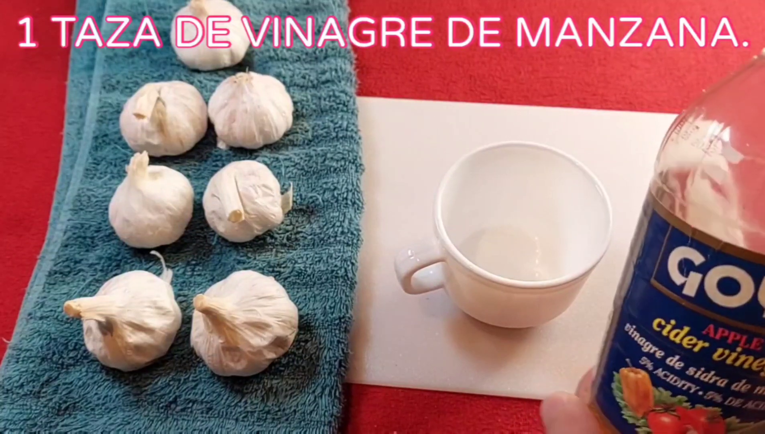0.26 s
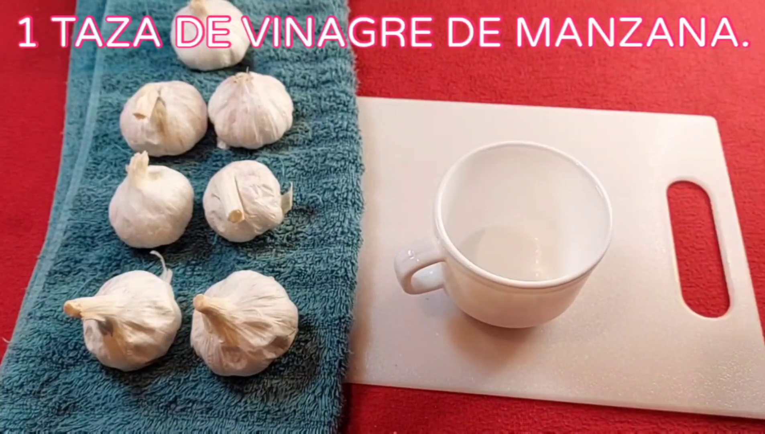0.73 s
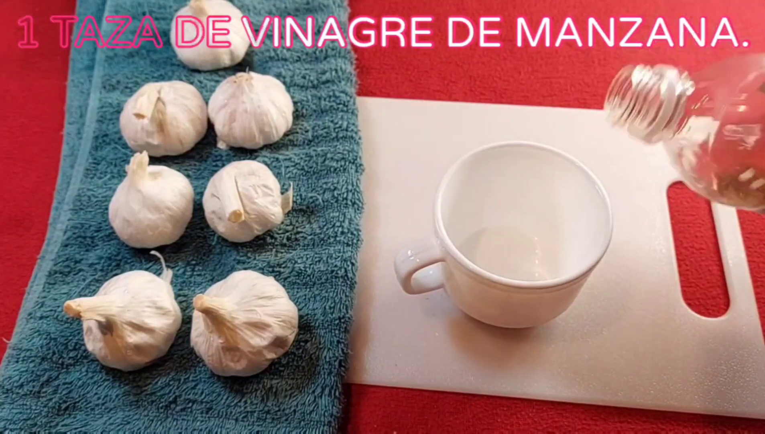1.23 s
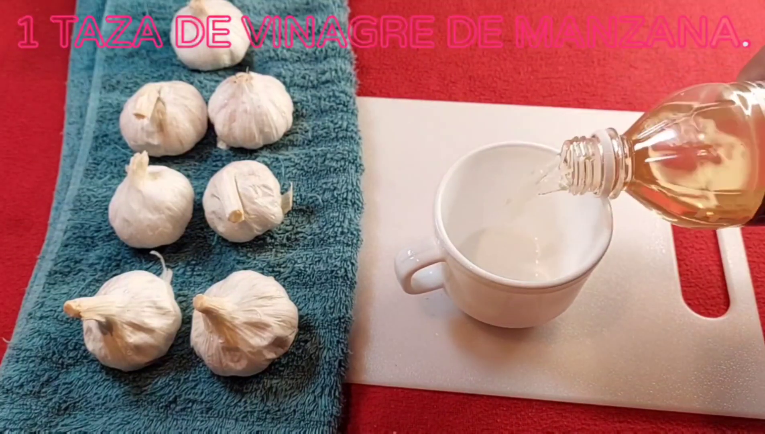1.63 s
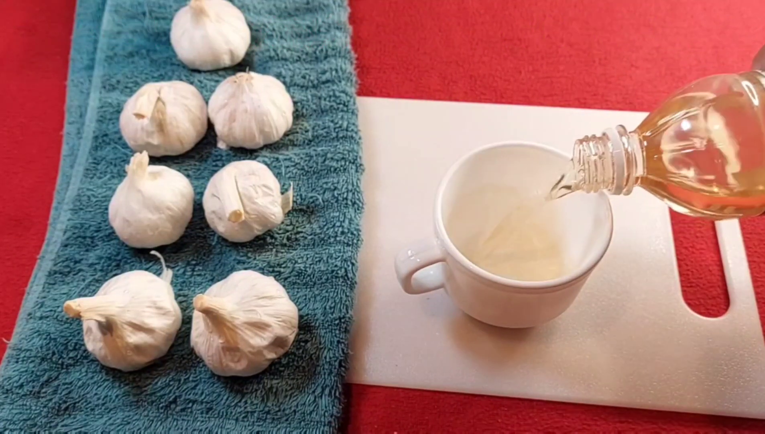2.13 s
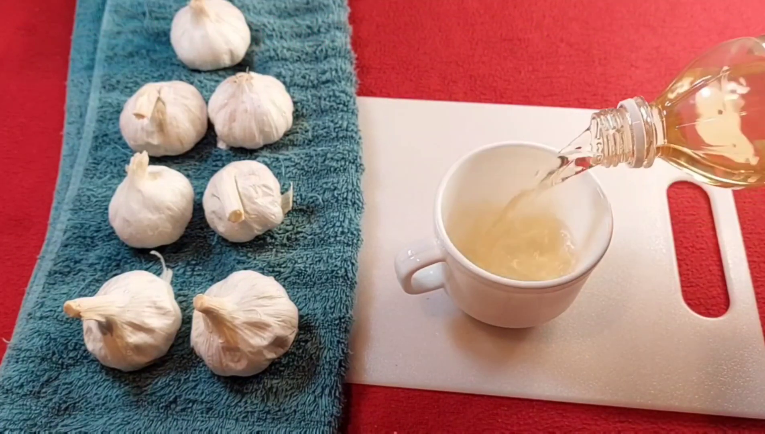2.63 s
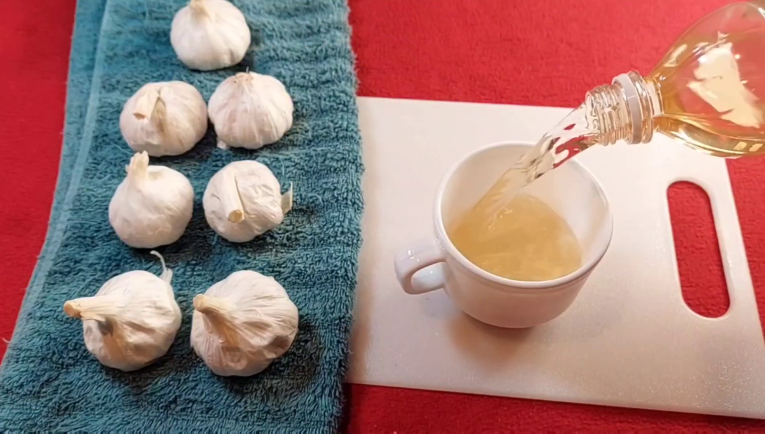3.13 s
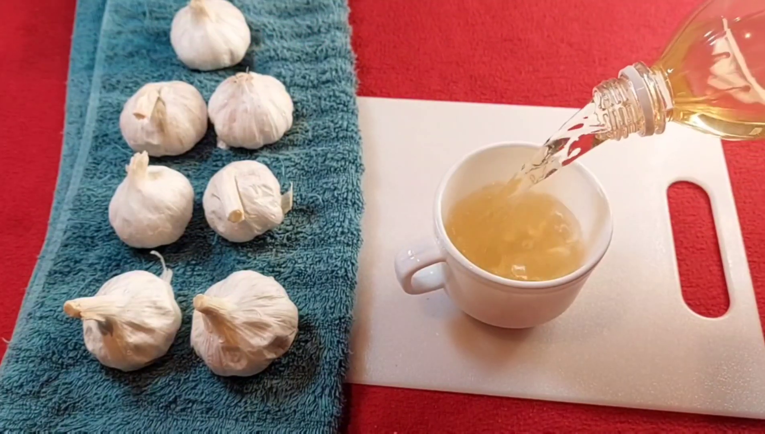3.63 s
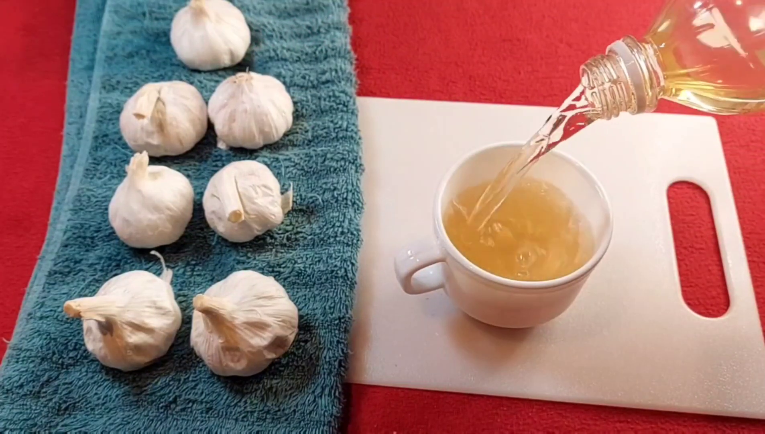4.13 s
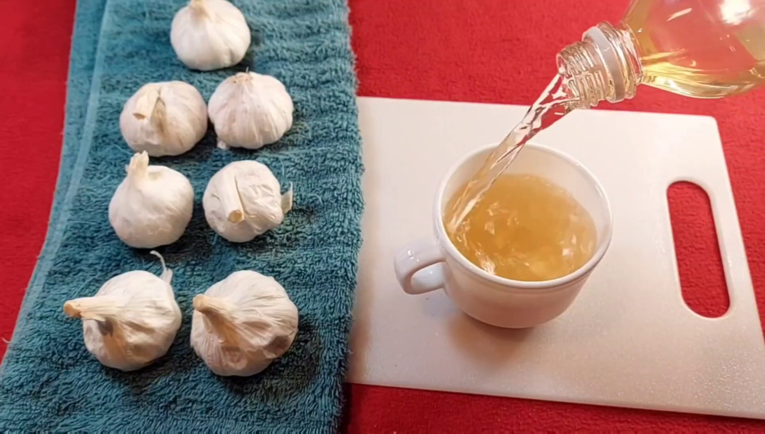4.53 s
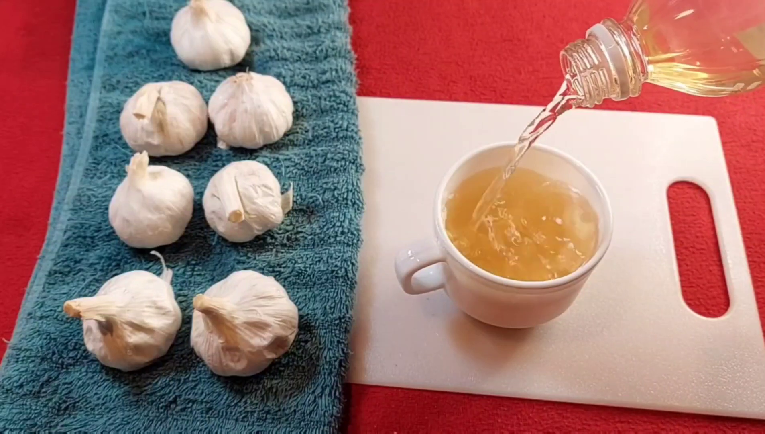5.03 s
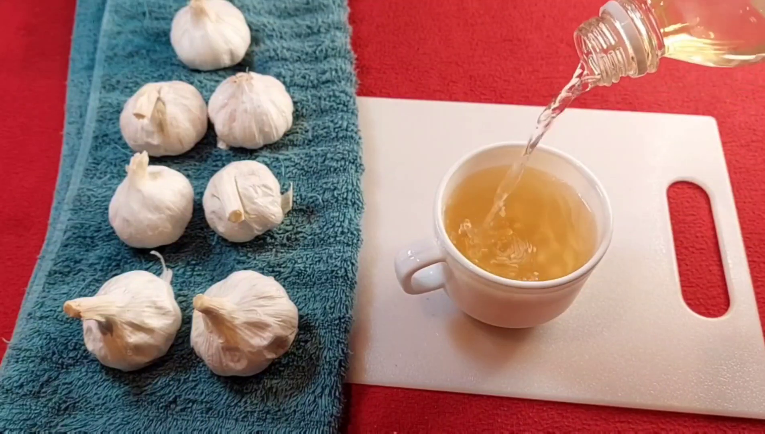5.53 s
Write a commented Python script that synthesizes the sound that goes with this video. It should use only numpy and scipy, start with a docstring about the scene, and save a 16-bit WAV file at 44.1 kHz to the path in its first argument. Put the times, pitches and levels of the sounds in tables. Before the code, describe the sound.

Close stereo microphone, small live kitchen, appliance hum throughout. First a rasping cap and hard plastic clicks, then a brief fainter rub with a snap. A pause. Liquid starts down the cup wall: delicate glassy bubbles, low puffs bumping mostly the right side, near silence, a few more plips, then a bubbling, hollow plunge of liquid that runs to the end.

```python
"""A plastic bottle opens with a short rasp and is lifted: slipping friction and snaps ring its wall modes.
Then a thin stream of vinegar slides down the wall of a china cup with faint, single chirping bubbles.
Puffs of air bump the microphone early in the pour, as low, short swings.
The stream plunges into the pool and burbles: surges drive bubbles, spray and wash, and a hollow sounds.
Throughout, a motor hums in the small kitchen: wavering tones over a rush of noise."""
import sys
import numpy as np
from scipy import signal
from scipy.fft import rfft, irfft, next_fast_len
from scipy.io import wavfile

SR = 44100
rng = np.random.default_rng(int(sys.argv[2]) if len(sys.argv) > 2 else 0)


def dump(signal):
    """Clip the signal to [-1, 1] and save it as 16-bit WAV at the path in sys.argv[1]."""
    limited = np.clip(np.atleast_2d(signal).T, -1, 1)
    pcm = np.round(limited * 32767).astype(np.int16)
    wavfile.write(sys.argv[1], SR, pcm)


N = 254456
TIME = np.arange(N) / SR

# bubbles that stand out as single plips, levels ahead of the cup and the pan:
# [t/s, pitch f/Hz, peak level/dB, life to -60 dB/cycles]
BUBBLES = [ (2.017, 2560, -57, 56), (2.018, 12100, -47, 8), (2.045, 12200, -47, 20), (2.072, 8300, -50, 35),
           (2.084, 10350, -43, 34), (2.115, 10400, -44.5, 13), (2.122, 6060, -60, 22),
           (2.141, 7390, -47.5, 34), (2.180, 7540, -49, 10), (2.199, 5630, -44, 12), (2.2, 3270, -53, 40),
           (2.225, 3200, -55, 27), (2.272, 7600, -39, 12.4), (2.278, 4180, -44, 27),
           (2.286, 13400, -42.5, 11), (2.388, 7800, -45, 35), (2.429, 9100, -46.5, 22),
           (2.453, 10000, -47, 11), (2.454, 4840, -58, 22), (2.463, 1350, -62, 18), (2.465, 3680, -52, 32),
           (2.49, 3500, -54, 13), (2.499, 2000, -64, 23), (2.5025, 6370, -38, 16), (2.503, 3670, -44, 22),
           (2.512, 4200, -49, 14), (2.524, 1950, -62, 14), (2.601, 10500, -46, 19), (2.669, 1600, -63, 22),
           (2.685, 1500, -60, 25), (2.706, 2500, -56, 16), (2.715, 1750, -61, 24), (2.732, 1830, -64, 24),
           (2.708, 7900, -53, 40), (2.721, 6470, -53, 21), (2.738, 4350, -54, 68), (2.744, 12800, -43, 11),
           (2.828, 1195, -60.5, 56), (2.857, 6100, -42, 20), (3.066, 8600, -55, 12),
           (3.125, 10000, -54, 13), (3.171, 10100, -52.5, 7.8), (3.244, 7800, -51, 36),
           (3.250, 1870, -54.5, 39), (3.268, 1900, -56, 30), (3.257, 3000, -55.5, 35),
           (3.27, 3100, -57, 44), (3.308, 3030, -64, 24), (3.357, 7800, -59, 110), (3.724, 5000, -67, 44),
           (3.768, 1880, -68, 33), (3.850, 6430, -66, 31), (3.996, 2215, -56.5, 62), (4.008, 2250, -56, 68),
           (4.044, 8200, -60, 3.3), (4.463, 5520, -52, 29), (4.487, 4820, -50, 12),
           (4.512, 4860, -50.5, 73), (4.528, 1650, -51.5, 13), (4.543, 3610, -42.5, 36),
           (4.556, 3380, -49, 28), (4.569, 3720, -53.5, 23), (4.590, 3550, -60, 28), (4.549, 1343, -52, 19),
           (4.572, 1370, -60, 14), (4.622, 3460, -59, 23), (4.639, 3600, -59, 24), (4.681, 6200, -62, 25),
           (4.822, 2660, -51, 19), (4.836, 2420, -61, 10), (4.907, 4630, -44, 15), (4.918, 4770, -47.5, 19),
           (4.949, 4960, -60, 26), (4.976, 4880, -61, 19), (5.003, 4830, -48.5, 16.5),
           (5.014, 4700, -49.5, 14), (5.028, 1890, -53, 8.9), (5.038, 1680, -58, 24),
           (5.053, 1780, -48, 15), (5.069, 1450, -51, 19), (5.076, 1616, -48, 71), (5.1017, 1550, -43, 14),
           (5.102, 1060, -46.5, 17), (5.115, 1570, -37.5, 19), (5.115, 2480, -46.5, 18),
           (5.123, 1410, -53, 22), (5.129, 2170, -43, 23), (5.142, 2150, -47, 18),
           (5.134, 7250, -34.5, 8.9), (5.149, 4300, -42, 14), (5.171, 1860, -33, 13),
           (5.187, 1900, -31, 20), (5.189, 2530, -45.5, 16), (5.197, 1920, -34, 19), (5.198, 2530, -46, 20),
           (5.21, 1815, -45, 17), (5.2247, 1518, -45, 12), (5.21, 5130, -43, 17), (5.228, 5400, -42.5, 25),
           (5.226, 11300, -37, 45), (5.2357, 2230, -33, 26), (5.251, 1900, -59, 13),
           (5.261, 5440, -42.5, 9.8), (5.263, 3940, -40, 14), (5.284, 6530, -36.5, 8.4),
           (5.294, 2200, -43, 21), (5.295, 2900, -46, 24), (5.313, 11600, -43, 22.5),
           (5.333, 7640, -45.5, 25), (5.340, 1540, -45.5, 26), (5.359, 1910, -44, 25),
           (5.359, 7600, -47, 19), (5.411, 2210, -48.5, 31), (5.483, 2100, -54.5, 19),
           (5.501, 1887, -46, 9.4), (5.542, 2130, -53.5, 43), (5.556, 5270, -52.5, 12),
           (5.58, 1450, -48.5, 10), (5.583, 910, -55, 11), (5.595, 1645, -60, 12.7),
           (5.597, 10800, -36, 14), (5.599, 3160, -49, 13), (5.613, 1387, -52, 21),
           (5.614, 3420, -41.5, 37), (5.615, 5130, -39, 8.6), (5.620, 2000, -49, 19), (5.63, 1260, -45, 14),
           (5.630, 14300, -32.5, 12), (5.631, 2000, -51, 20), (5.648, 1820, -40, 16),
           (5.6504, 1170, -45, 12), (5.662, 1660, -48, 14), (5.667, 2180, -50, 18), (5.692, 3740, -48, 22),
           (5.693, 1500, -44, 12), (5.701, 1310, -48, 18), (5.696, 7540, -37, 49), (5.695, 11500, -23, 19),
           (5.7279, 2160, -31, 27), (5.728, 7200, -35, 15), (5.730, 1425, -40.5, 43),
           (5.7338, 2550, -33.5, 27), (5.7405, 1660, -52, 16), (5.742, 11200, -35, 29),
           (5.745, 2380, -46, 15), (5.7558, 5200, -32, 31), (5.756, 13000, -34, 22)]
# surges, when the stream breaks the surface and drags air under, levels ahead of each layer's trim:
# [t/s, hold/s, churn level/dB, typical bubble pitch f/Hz, fine spray level/dB]
SURGES = [(2.026, 0.14, -79, 5900, -70.5), (2.471, 0.068, -66.5, 3070, -76.5),
          (2.72, 0.056, -67, 1850, -73.5), (3.248, 0.05, -67, 2240, -72),
          (4.549, 0.084, -65.5, 3270, -75.5), (4.906, 0.18, -66, 4720, -79.5),
          (5.101, 0.18, -56, 2130, -72), (5.327, 0.034, -59.5, 1930, -65.5), (5.484, 0.078, -66, 2079, -71),
          (5.602, 0.049, -56.5, 1760, -71), (5.733, .04, -57.5, 1680, -59)]
# ringing modes of the bottle wall, levels relative to what excites them: [f/Hz, level/dB, t60/s]
BOTTLE = [(754, -8, 0.016), (880, -12, 0.014), (1164, -5.5, 0.011), (1440, -3, 0.0056),
          (1906, -13.5, 0.025), (2690, -15.5, 0.026), (3076, -14, 0.022), (3784, -14.5, 0.028),
          (4030, -24, 0.017), (5040, -13.5, 0.017)]

FULL_CHURN_DB = -55   # the churn at which bubble rate and pitch climb have their stated values
FIZZ_HZ = 5860        # typical pitch of the small fizz


def bubbles(wander_db=2, fizz_pan_db=-3.5, lag_s=.00008, faint_climb=0.24):
    """Plips and fainter bubbles, each at its own spot, higher ones to the right; churn makes them chirp faster."""
    full_climb_per_s, climb_follows = 52, 0.93   # share of the pitch per second; share of the churn's dB
    typical_db, typical_hz = churn()
    climb_per_s = full_climb_per_s * from_db(climb_follows * (typical_db - FULL_CHURN_DB))
    places = rng.standard_normal((N // 10, 2))
    faint = fragments() + swarm(typical_db, typical_hz)
    climbs = [1] * len(BUBBLES) + [faint_climb] * len(faint)
    out = np.zeros((2, N))
    for (s, hz, db, cycles), climb, (side, path) in zip(BUBBLES + faint, climbs, places):
        rise = climb * climb_per_s[min(int(s * SR), N - 1)] * cycles / hz
        pan_db = wander_db * min(hz / FIZZ_HZ, 1) * side + fizz_pan_db * hz / FIZZ_HZ
        left, right = pan(pan_db) * bubble(hz, db, cycles, rise)
        add(out[0], s, left)
        add(out[1], s + lag_s * path, right)
    return out


def bubble(hz, db, cycles, rise, birth=0.072):
    """A trapped bubble swells, rings and dies; its pitch climbs as it nears the surface."""
    samples = np.arange(int(1.2 * cycles / hz * SR) + 2)
    life = samples * hz / (cycles * SR)   # 1 when the decay reaches -60 dB
    turns = cycles * (life + rise * life ** 2 / 2)
    swell = from_db(-60 * life) * (1 - np.exp(-(life / birth) ** 2))
    return from_db(db) * swell / swell.max() * np.sin(2 * np.pi * turns)


def fragments(count=3, cycles=30):
    """A plip breaks up into a dying run of bubbles near its pitch; rows as in BUBBLES."""
    gap_s, loss_db, top_db, detune = 0.011, 5.5, -54, 0.066
    chance = rng.uniform(-1, 1, (len(BUBBLES), count, 2))
    rows = []
    for (s, hz, db, _), run in zip(BUBBLES, chance):
        for k, (late, pitch) in enumerate(run, 1):
            level_db = min(db, top_db) - loss_db * k
            rows.append((s + gap_s * (k + late / 2), hz * (1 + detune * pitch), level_db, cycles))
    return rows


def swarm(typical_db, typical_hz, cycles=18, octaves=1.63):
    """Faint bubbles at random, more of them as the churn grows; rows as in BUBBLES."""
    pour_start_s, fizz_share = 1.9, 0.23   # a fixed share is small fizz, whatever the surge
    full_per_s, rate_follows = 390, 0.42   # the bubble rate follows this share of the churn's dB
    per_s = full_per_s * from_db(rate_follows * (typical_db - FULL_CHURN_DB))
    born = np.flatnonzero((rng.random(N) < per_s / SR) & (TIME > pour_start_s))
    rows = []
    for i, (kind, pitch, life) in zip(born, rng.random((N, 3))[born]):
        centre_hz = FIZZ_HZ if kind < fizz_share else typical_hz[i]
        hz = centre_hz * 2 ** (octaves * (pitch - .5))
        rows.append((i / SR, hz, typical_db[i], cycles * (.5 + life)))
    return rows


def churn(trickle_db=-83, trickle_hz=2365):
    """The strongest surge, or else the trickle down the wall, sets the bubbles' typical dB and pitch."""
    _, _, db, hz, _ = np.transpose(SURGES)
    levels = np.vstack([surge_levels(db), np.full(N, trickle_db)])
    return levels.max(0), np.append(hz, trickle_hz)[levels.argmax(0)]


def surge_levels(levels_db, rise_db_per_s=234, fall_db_per_s=158.5):
    """Each surge rises quickly to its level, holds and ebbs; one row of dB per surge."""
    rows = []
    for (s, hold, *_), db in zip(SURGES, levels_db):
        corners_s = [s - 1, s, s + hold, s + hold + 1]
        rows.append(np.interp(TIME, corners_s, [db - rise_db_per_s, db, db, db - fall_db_per_s]))
    return np.array(rows)


def wash(wash_db=-10.0):
    """Countless bubbles too faint to tell apart merge into a wet wash under each surge."""
    # colour of the churning pool, before levelling: [f/Hz, density level/dB]
    wash_colour = [(400, -17), (800, -13), (1400, 8), (2300, -5.5), (3000, -4.5), (4500, -8), (9000, -20)]
    level_db = surge_levels([row[2] for row in SURGES]).max(0) + wash_db
    return friction(np.column_stack([TIME, level_db]), wash_colour, slips_per_s=2500, spread_db=2)


def spray(pinch_db=-18, pinch_t60=0.039, brief_cycles=16, prickle_db=-4):
    """Fine mist prickles on the surface; each plip pinches off with a tick, strongest for the briefest."""
    # colour of mist and ticks, before levelling: [f/Hz, density level/dB]
    spray_colour = [(500, -3), (850, -4.5), (1900, -8), (3200, -7.5), (6000, -6.5), (10000, -4),
                    (15000, -6.5)]
    t, ticks = TIME[:SR // 50], np.zeros(N)
    for s, hz, db, cycles in BUBBLES:
        briefness = (brief_cycles / cycles) ** 0.91
        add(ticks, s, from_db(db + pinch_db - 60 * t / pinch_t60) * briefness)
    spray_db = surge_levels([row[-1] for row in SURGES]).max(0) + prickle_db
    prickle = friction(np.column_stack([TIME, spray_db]), spray_colour, slips_per_s=1200, spread_db=3)
    return prickle + ticks * coloured(rng.standard_normal((2, N)), spray_colour)


def droplets(per_s=70, above_spray_db=15, spread_db=7, hz=10000, octaves=1.0, cycles=17):
    """Flung droplets land one by one, each trapping a tiny bubble that ticks."""
    typical_db = surge_levels([row[-1] for row in SURGES]).max(0) + above_spray_db
    born = np.flatnonzero(rng.random(N) < per_s / SR)
    out = np.zeros(N)
    for i, (pitch, loud) in zip(born, rng.random((N, 2))[born] - .5):
        level_db = typical_db[i] + spread_db * loud
        add(out, i / SR, bubble(hz * 2 ** (octaves * pitch), level_db, cycles, rise=0))
    return out


def hollow(width_hz=35):
    """Turbulence sounds the hollow dug in the pool by the stream; its note falls as it deepens."""
    # note of the hollow, levels ahead of the pan: [t/s, f/Hz, rms level/dB]
    hollow_curve = [(5.03, 1520, -73), (5.07, 1230, -71), (5.105, 1080, -59), (5.15, 970, -74),
                    (5.19, 882, -58), (5.26, 800, -67), (5.34, 790, -79), (5.56, 895, -94),
                    (5.585, 854, -68.5), (5.65, 773, -64), (5.77, 684, -66)]
    hz, db = in_time(hollow_curve)
    tone = rms_one(wavering_resonance(rng.standard_normal(N), hz, width_hz))
    return from_db(db) * (TIME > hollow_curve[0][0]) * tone


def cluster_and_air_mode(fade_db_per_s=127):
    """An abrupt cluster of bubbles near 4.5 kHz fades slowly; the stream keeps an air mode near 1960 Hz sounding."""
    # bubble cluster and air mode, levels ahead of the pan:
    # [peak t/s, f/Hz, level/dB, width/Hz, rise/(dB per s)]
    unsteady_tones = [(2.742, 4550, -68.5, 380, 4000), (3.26, 1960, -73, 70, 103)]
    out = 0
    for s, hz, db, width_hz, rise in unsteady_tones:
        phase = 2 * np.pi * hz * TIME
        # unsteady in strength and phase
        tone = drift(width_hz) * np.sin(phase) + drift(width_hz) * np.cos(phase)
        below_peak_db = np.maximum(rise * (s - TIME), fade_db_per_s * (TIME - s))
        out = out + from_db(db - below_peak_db) * tone
    return out


def cup(x, echo_db=-7, echo_t60=0.02, slosh_hz=5, slosh_detune=0.027):
    """The cup's air rings along and its wall scatters echoes; both keep shifting as the pool sloshes."""
    # air resonances, levels relative to the direct sound: [f/Hz, width/Hz, level/dB]
    cup_modes = [(690, 51, 4), (810, 45, 3), (1656, 22, 5), (1897, 17, 3), (2755, 20, 6.5), (3835, 90, 4),
                 (5120, 710, -4)]
    turn = np.pi * drift(slosh_hz)   # fades between two unrelated scatters
    scatter = echoes(x * np.cos(turn), echo_t60) + echoes(x * np.sin(turn), echo_t60)
    air = 0
    for hz, width, db in cup_modes:
        moving_hz = hz * (1 + slosh_detune * drift(slosh_hz))
        air = air + from_db(db) * wavering_resonance(x, moving_hz, width)
    return x + from_db(echo_db) * scatter + air


def echoes(x, t60):
    """A quick scatter of reflections, with gain 1."""
    t = TIME[:SR // 20]
    scatter = rng.standard_normal((2, len(t))) * from_db(-60 * t / t60) * (t > .001)
    scatter /= np.sqrt(np.sum(scatter ** 2, axis=1, keepdims=True))
    return signal.fftconvolve(x, scatter, axes=1)[:, :N]


def handling(wall_db=3):
    """The cap's thread and the sliding hand set the bottle's wall ringing; snaps join in."""
    # strokes of the cap on its thread and of the hand, ahead of the rubbing gain: [t/s, level/dB]
    rasp_curve = [(0, -48), (.04, -47), (.055, -36.5), (.09, -37), (.116, -29.5), (.135, -35), (.15, -38),
                  (.17, -65), (.2, -100)]
    slide_curve = [(.64, -68), (.66, -56.5), (.74, -52.5), (.77, -56), (.786, -43.5), (.83, -57), (.9, -68)]
    # colours of the two frictions, before levelling: [f/Hz, density level/dB]
    rasp_colour = [(60, -23), (300, -2), (700, -4), (1200, -6), (3000, -1), (4200, -10.5), (6500, -13.5),
                   (9000, -17.5), (15000, -20)]
    slide_colour = [(400, -8), (1500, 9.5), (4700, 2.5), (6500, 3), (10000, 3), (15000, 6)]
    rasp = friction(rasp_curve, rasp_colour, slips_per_s=9000, spread_db=2.2)
    slide = friction(slide_curve, slide_colour, slips_per_s=4300, spread_db=0.0)
    rubbing = rasp + slide
    wall = 0
    for hz, db, t60 in BOTTLE:
        width_hz = np.log(1000) / (np.pi * t60)
        wall = wall + from_db(db + wall_db) * resonance(rubbing, hz, width_hz)
    return from_db(-9) * (rubbing + wall) + snaps()


def snaps(thump_t60=0.02, tick_t60=0.034, thump_db=-4, tick_db=-3, off_pitch_db=5, detune=0.038,
          spread=0.6, attack_s=0.00048):
    """Each snap ticks, thumps the body and rings the wall; modes shift with the grip, weaker off pitch."""
    # snaps of the plastic, levels ahead of the trims and the pan:
    # [t/s, ring level/dB, favoured f/Hz, dull thump level/dB, bright tick level/dB]
    snap_list = [(0.051, -21.5, 2250, -59, -72), (0.0695, -24, 1230, -60, -62),
                 (0.116, -45, 5000, -55, -40), (0.123, -21, 1390, -24, -40), (0.128, -26, 2590, -31, -44),
                 (.1325, -23, 1500, -29, -45), (0.1397, -31.5, 3000, -27, -62),
                 (0.6401, -77, 3000, -83, -52.5), (0.735, -55, 1800, -36, -62),
                 (0.744, -44, 3600, -54, -57), (0.783, -60, 1700, -35, -61), (0.791, -34.5, 5300, -39, -64)]
    # colour of the thump, before levelling: [f/Hz, density level/dB]
    thump_colour = [(50, -26), (90, -5), (130, 11), (300, 6), (700, -1.5), (1200, -15), (2500, -55)]
    out, thumps = np.zeros((2, N)), np.zeros(N)
    t = TIME[:SR // 8]
    for s, db, favoured_hz, low_db, high_db in snap_list:
        for hz, mode_db, t60 in BOTTLE:
            favour = from_db(-off_pitch_db * np.log2(hz / favoured_hz) ** 2)
            strength = rng.choice([-1, 1]) * (1 + spread * rng.standard_normal((2, 1))) * favour
            envelope = from_db(db + mode_db - 60 * t / t60) * (1 - np.exp(-t / attack_s))
            shifted_hz = hz * (1 + detune * rng.standard_normal())
            add(out, s, strength * envelope * np.sin(2 * np.pi * shifted_hz * t))
        tick = from_db(high_db + tick_db - 60 * t / tick_t60) * rng.standard_normal((2, len(t)))
        add(out, s, tick)
        add(thumps, s, from_db(low_db + thump_db - 60 * t / thump_t60))
    return out + thumps * coloured(rng.standard_normal((2, N)), thump_colour)


def friction(curve, colour, slips_per_s, spread_db):
    """Dense tiny random slips, their sizes spread in dB, follow a level curve."""
    slips = (rng.random(N) < slips_per_s / SR) * from_db(spread_db * rng.standard_normal(N))
    return from_db(in_time(curve)[0]) * coloured(slips * rng.standard_normal((2, N)), colour)


def puffs(cycles=7.2):
    """Each puff of air pushes the diaphragm through a swing or two, mostly on the right."""
    # puffs on the microphone: [t/s, peak level on the right/dB, f/Hz]
    puff_list = [(2.166, -32.5, 107), (2.181, -33.5, 74), (2.201, -27.5, 85), (2.268, -38, 57),
                 (2.338, -36, 63.4), (2.407, -38, 58.7)]
    out = np.zeros(N)
    for s, db, hz in puff_list:
        add(out, s, bubble(hz, db, cycles, rise=0.065, birth=0.017))   # borrows the bubble's envelope
    return out * from_db([[-17], [0]])


def motor(waver=0.25, flutter=0.14, waver_hz=4, air_db=-55.5):
    """Mains-driven tones waver slightly and swell slowly, over a steady rush of air."""
    # the motor's tones, levels ahead of swell and pan: [f/Hz, rms level/dB]
    hum_tones = [(59, -85.5), (176.8, -64.5), (196, -81), (235.3, -56), (271.8, -66.5), (295, -69),
                 (314, -75), (353.9, -60), (362.3, -70), (472, -69.5), (531, -79.5), (649.2, -76),
                 (708.3, -74.5), (767.3, -81.5), (826, -84.5), (885.2, -88.5)]
    # slow swell of the hum: [t/s, level/dB]
    hum_swell = [(0, 2), (.6, .5), (1.3, 0), (2.0, 0), (2.5, 1.5), (2.9, -2), (3.6, -1), (4.1, -1),
                 (4.4, 2.5), (4.85, -2.5), (5.3, 1), (5.77, 0)]
    # colour of the rush of air in the room, before levelling: [f/Hz, density level/dB]
    air_colour = [(32, -14.5), (45, -11.5), (60, 0), (76, -9), (112, -2.5), (165, -9.5), (228, 3),
                  (255, -4), (335, 0.5), (430, -10.5), (510, -7), (720, -18), (1100, -24), (2200, -40),
                  (5000, -44), (15000, -46.5)]
    tones = 0
    for hz, db in hum_tones:
        phase = 2 * np.pi * (hz * TIME + rng.random()) + waver * drift(waver_hz)
        tones = tones + np.sqrt(2) * from_db(db) * (1 + flutter * drift(waver_hz)) * np.sin(phase)
    hum = tones * from_db(in_time(hum_swell)[0]) * pan(-1.6)
    air = from_db(air_db) * coloured(rng.standard_normal((2, N)), air_colour) * pan(0.31)
    return hum + air


def kitchen(x):
    """Diffuse reverberation as decaying noise bands, dying sooner in the treble; about unit gain at mid pitch."""
    # decay of the room: [f/Hz, t60/s]
    decay = [(100, 0.6), (1000, 0.55), (4000, 0.41), (8000, 0.5), (16000, 0.48)]
    t, tail = TIME[:SR // 2], 0
    edges = np.geomspace(80, 18000, 9)
    for low, high in zip(edges, edges[1:]):
        bandpass = signal.butter(2, [low, high], "band", fs=SR, output="sos")
        band = signal.sosfilt(bandpass, rng.standard_normal((2, len(t))))
        tail = tail + band * from_db(-60 * t / at_hz(decay, np.sqrt(low * high)))
    mid_t60 = decay[1][1]
    tail = tail * (t > .006) / np.sqrt(SR * mid_t60 / np.log(10 ** 6))
    return signal.fftconvolve(x.mean(0)[None], tail, axes=1)[:, :N]


def coloured(pair, spectrum):
    """Two unrelated signals become left and right with a spectrum, more alike in the bass; rms 1."""
    # left-right likeness: [f/Hz, correlation]
    likeness = [(40, 0.64), (70, 0.24), (130, 0.49), (300, 0.57), (600, 0.048), (1300, 0.046),
                (3000, 0.009), (15000, 0.014)]
    size = next_fast_len(N, real=True)
    hz = np.arange(size // 2 + 1) * SR / size
    alike = np.clip(at_hz(likeness, hz), 0, 1)
    mid, side = rfft(pair, size) * from_db(at_hz(spectrum, hz))
    stereo = np.sqrt(1 + alike) * mid + np.sqrt(1 - alike) * side * [[1], [-1]]
    return rms_one(irfft(stereo, size)[:, :N])


def resonance(x, hz, width_hz):
    """Two-pole resonance with gain 1 on top."""
    r = np.exp(-np.pi * width_hz / SR)
    zeros = np.array([1, 0, -1]) * (1 - r * r) / 2
    return signal.lfilter(zeros, [1, -2 * r * np.cos(2 * np.pi * hz / SR), r * r], x + 1e-18)


def wavering_resonance(x, hz, width_hz):
    """A resonance whose centre is given for every sample; gain 1 on top."""
    carrier = np.exp(2j * np.pi * np.cumsum(hz) / SR)
    r = np.exp(-np.pi * width_hz / SR)
    # shift the centre down to 0 Hz, smooth, shift back
    smoothed = signal.lfilter([1 - r], [1, -r], x * carrier.conj() + 1e-18)
    return 2 * np.real(carrier * smoothed)


def drift(rate):
    """Slow random wander with rms 1: noise smoothed twice at a rate in Hz."""
    step = 40   # samples between computed points
    r = np.exp(-2 * np.pi * rate * step / SR)
    noise = rng.standard_normal(N // step + 2002)
    slow = signal.lfilter([1], [1, -2 * r, r * r], noise)[2000:]   # drops the filter's start-up
    return np.interp(np.arange(N) / step, np.arange(len(slow)), rms_one(slow))


def from_db(db):
    """Decibels to gain."""
    return 10 ** (np.asarray(db) / 20)


def rms_one(x):
    """Scale to rms 1."""
    return x / np.sqrt(np.mean(x ** 2) + 1e-20)


def in_time(rows):
    """The columns of a curve at every sample."""
    s, *columns = np.transpose(rows)
    return [np.interp(TIME, s, c) for c in columns]


def at_hz(points, hz):
    """Read a spectrum on a log-frequency axis."""
    f, value = np.transpose(points)
    return np.interp(np.log(np.maximum(hz, 1)), np.log(f), value)


def pan(db):
    """Left and right gains for a level difference, left over right."""
    return from_db(np.array([[db], [-db]]) / 2)


def add(track, s, sound):
    """Mix a sound into a track at a time in seconds."""
    i = int(np.clip(s * SR, 0, N - 1))
    track[..., i:i + sound.shape[-1]] += sound[..., :N - i]


def scene(bottle_room_db=-9.0, pour_room_db=-6.5):
    """Bottle and cup also feed the kitchen's reverberation; puffs and motor stay outside it."""
    bottle = handling() * pan(-1.6)
    in_cup = from_db(-2.0) * cup(bubbles() + droplets() + spray() + wash())
    pour = (in_cup + cluster_and_air_mode() + hollow()) * pan(-0.25)
    room = kitchen(from_db(bottle_room_db) * bottle + from_db(pour_room_db) * pour)
    return bottle + pour + room + puffs() + motor()


def record(dry, low_cut_hz=38, top_cut_hz=15900):
    """The microphone drops the deepest bass; the top is cut steeply."""
    low_cut = signal.butter(4, low_cut_hz, "high", fs=SR, output="sos")
    top_cut = signal.ellip(10, .2, 70, top_cut_hz, fs=SR, output="sos")
    return signal.sosfilt(top_cut, signal.sosfilt(low_cut, dry))


dry = scene()
out = record(dry)
dump(out)
```